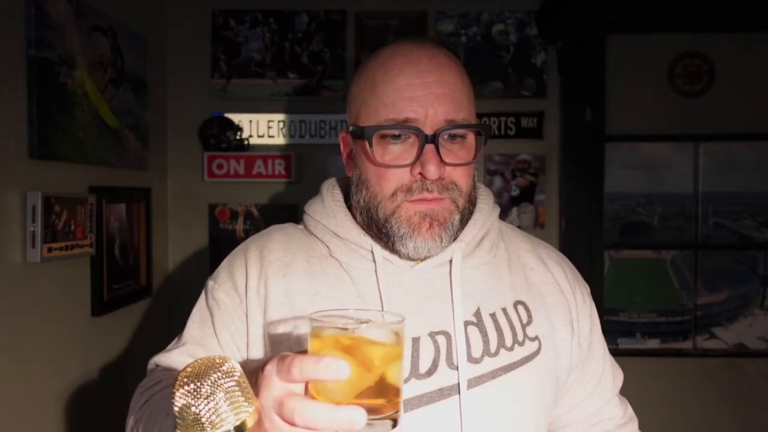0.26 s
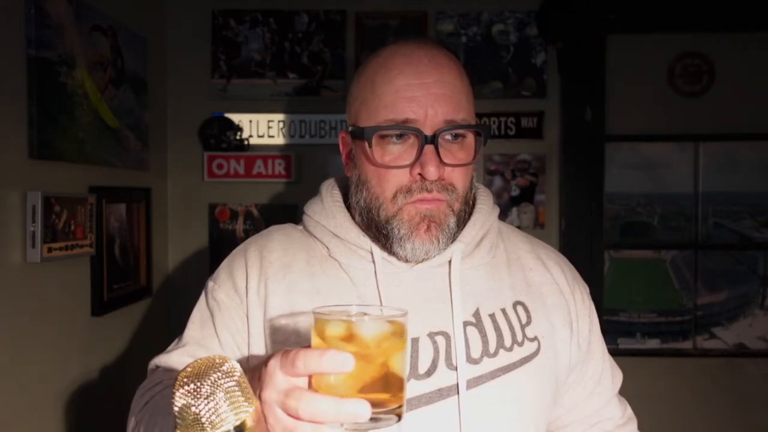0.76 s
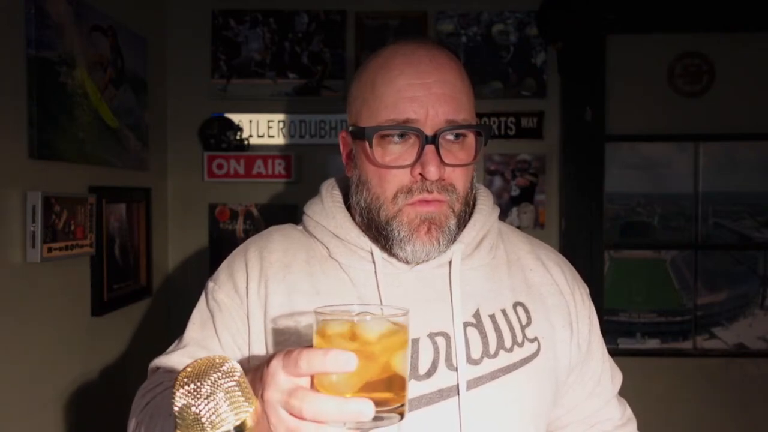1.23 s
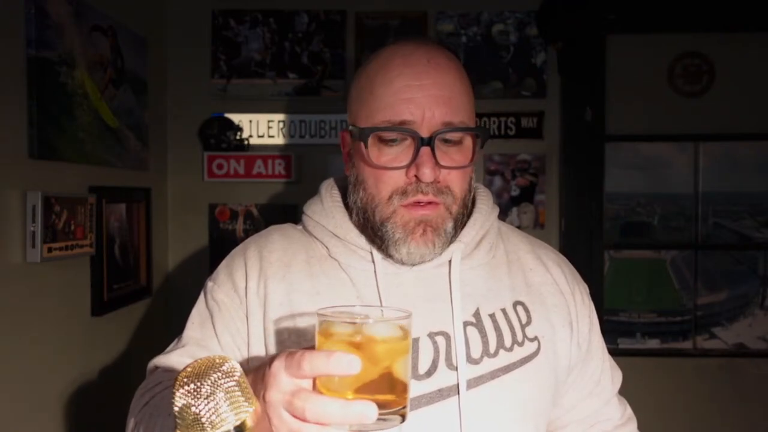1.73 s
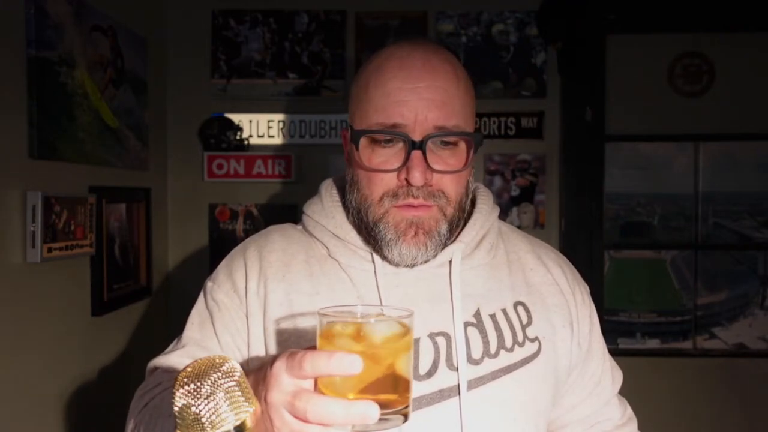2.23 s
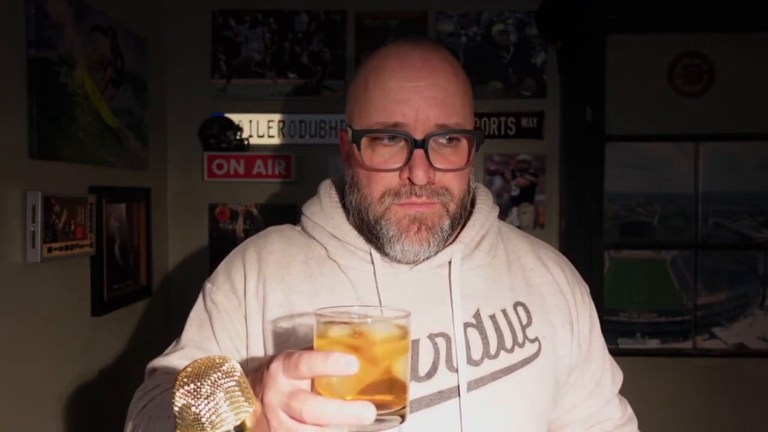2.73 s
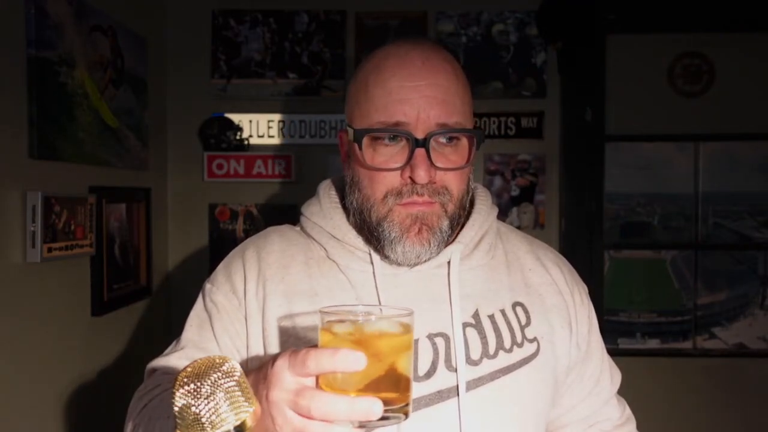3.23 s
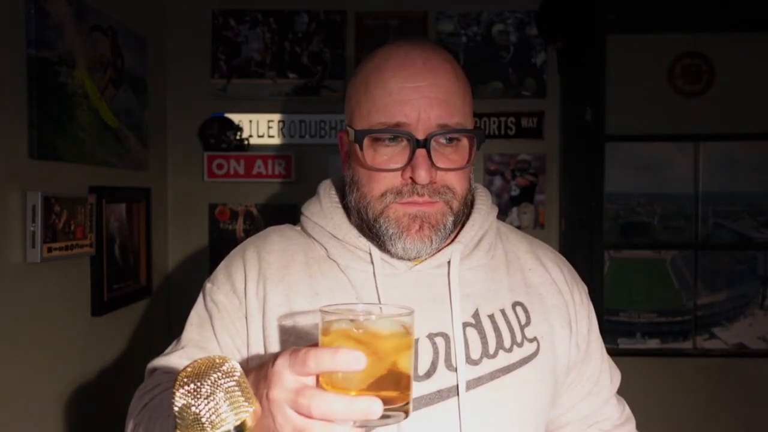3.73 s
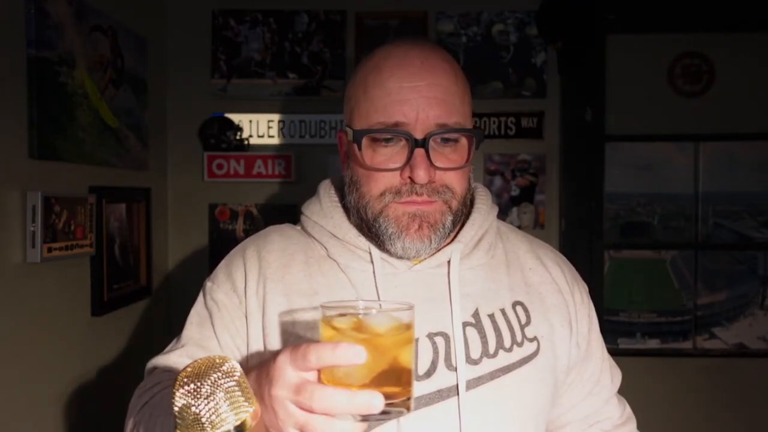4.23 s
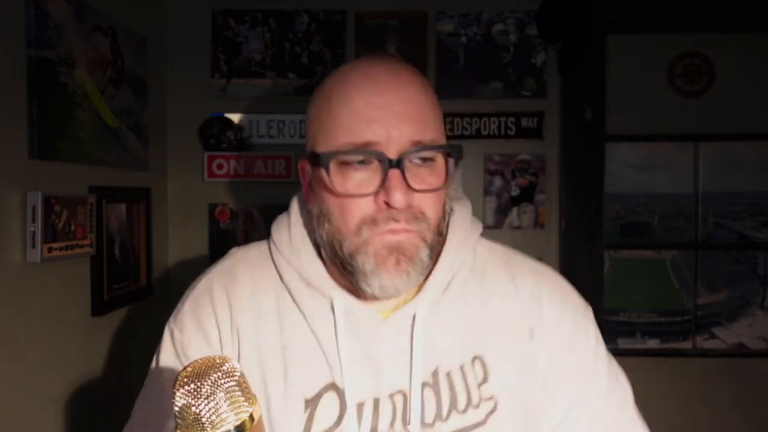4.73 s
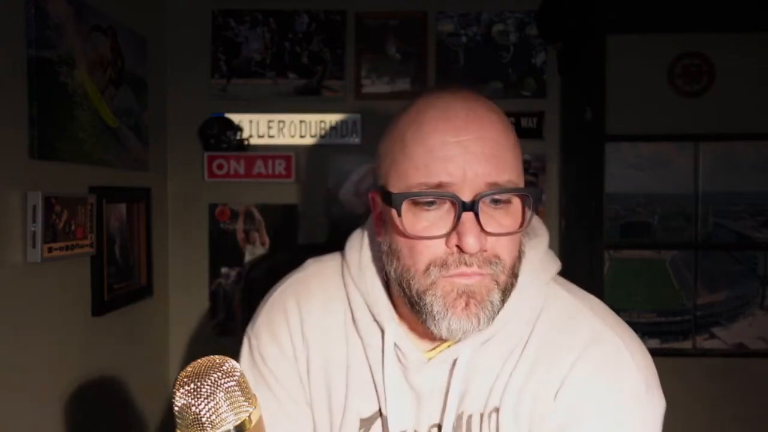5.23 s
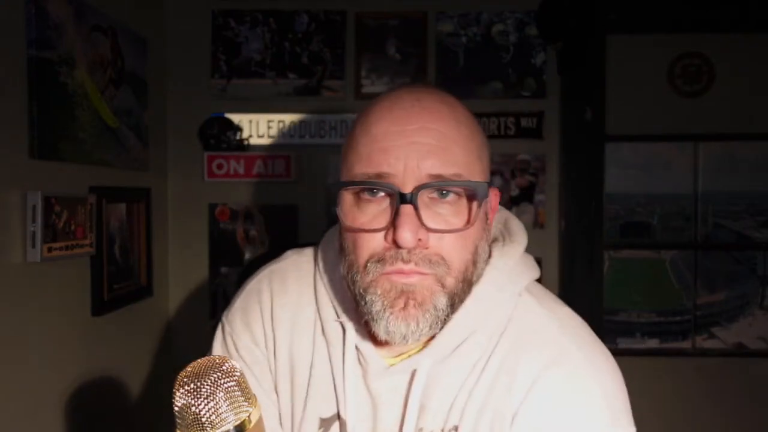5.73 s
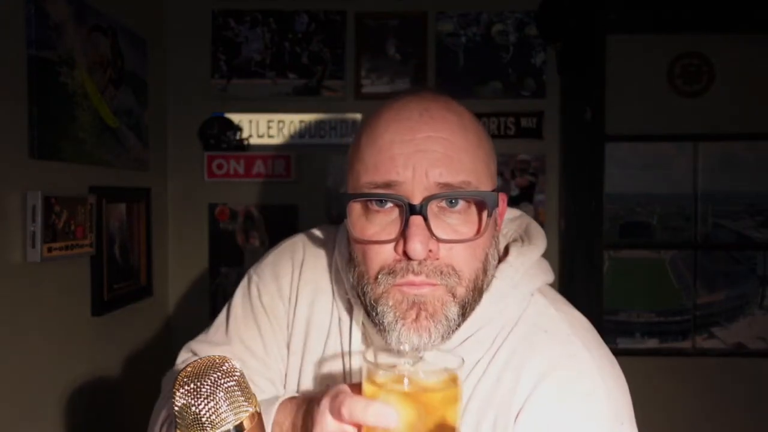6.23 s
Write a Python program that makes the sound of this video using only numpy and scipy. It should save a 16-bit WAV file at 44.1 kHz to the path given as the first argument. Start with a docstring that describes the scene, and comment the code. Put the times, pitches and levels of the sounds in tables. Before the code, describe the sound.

Close, busy rattling of ice against a tumbler for over four seconds, fading to faint clicks, a sleeve rustle and a dull low thump.

```python
"""Ice cubes swirled in a hand-held tumbler of drink strike its wall and tumble over one another.
Each contact sums damped sine modes of glass and cube with noise bursts for clack, tick and knock.
The drink gulps now and then: decaying sines that rise in pitch. Deep noise swells as the arm swings.
Then a sleeve rustles as uneven noise, and an elbow lands on the desk: low modes and two noise bursts.
The microphone is close, in a small, dead room of sparse, dull reflections and steady room tone."""
import sys
import numpy as np
from scipy import signal
from scipy.fft import rfft, irfft, next_fast_len
from scipy.io import wavfile

SR = 44100
rng = np.random.default_rng(int(sys.argv[2]) if len(sys.argv) > 2 else 0)


def wav_record(signal):
    """Record a signal, one row per channel, as 16-bit PCM in the file named by sys.argv[1]."""
    frames = np.transpose(np.atleast_2d(signal))
    bounded = np.clip(frames, -1, 1)
    # unit amplitude maps onto the largest positive 16-bit level
    quanta = np.round(bounded * 32767).astype(np.int16)
    wavfile.write(sys.argv[1], SR, quanta)


N = 284879

# All *_SPECTRUM tables hold relative gains; those of the contact bursts are shifted in pitch when used.

# room tone: hz, gain_db
AIR_SPECTRUM = [(30, -23.5), (70, -1.5), (140, 3.5), (380, -11.5), (650, -8.5), (1000, -22.5), (2000, -13),
                (5000, -30.5), (13000, -31), (16000, -30.5)]
AIR_DB = -72
# deep air noise of the moving arm: hz, gain_db
RUMBLE_SPECTRUM = [(10, -36), (24, -4), (32, 8.5), (41, -0.5), (50, -17.5), (90, -62.5)]
# swings of the arm push air at the microphone: peak_s, length_s, level_db
ARM_SWINGS = [(0.025, 0.22, -57.5), (0.373, 0.17, -49), (0.843, 0.14, -51.5), (1.25, 0.33, -60),
              (1.63, 0.39, -59), (4.64, 0.19, -58.5), (5.09, 0.3, -51), (5.586, .14, -45.5),
              (5.694, 0.11, -51.5), (5.863, 0.46, -54), (6.16, 0.18, -78)]
STILL_DB = -75  # rumble while the arm is nearly still

# sleeve friction before the unevenness and trims: time_s, rub_db, hiss_db
SLEEVE_LEVELS = [(4.75, -66.5, -73.5), (5.108, -72.5, -73.5), (5.232, -73, -73.5), (5.374, -74.5, -73.5),
                 (5.572, -77, -83), (5.758, -80.5, -75), (6.032, -75.5, -69.5), (6.146, -72.5, -67.5),
                 (6.312, -78, -72.5), (6.45, -90, -92)]
# cloth dragged over cloth: hz, gain_db
RUB_SPECTRUM = [(100, -2), (250, 4.5), (450, 2), (750, -3), (1300, -2.5), (2600, -29), (5200, -25),
                (8000, -60)]
# hiss of the cloth fibres: hz, gain_db
HISS_SPECTRUM = [(1500, -14), (3000, 6.5), (5200, 3), (6500, 0.5), (8000, 3.5), (11000, -4.5), (13500, 0.5),
                 (16000, -15)]

# the arm meets the desk: start_s, gain_db, rise_s, pitch_factor, ring_factor
DESK_BLOWS = [(5.744, -12, 0.02, 1.12, 0.43), (5.802, 6, 0.011, 1.1, 0.18), (5.834, -4, 0.0073, 0.96, 0.26),
              (5.867, 0, 0.0044, 1.02, 1)]
# desk modes, before each blow's gain and factors: nominal_hz, level_db, nominal_t60_s, build_up_s
DESK_MODES = [(187, -38, 0.53, 0.00088), (118.4, -33.5, 0.54, 0.089), (225.4, -62, 0.26, .002),
              (169.5, -64, 0.32, .002), (330, -54, 0.18, .002), (447, -60, 0.28, .002)]
# noise of the elbow's landing: hz, gain_db
BUMP_SPECTRUM = [(150, -26), (250, 1.5), (439, -18), (944, -13.5), (1230, -22.5), (1540, -18.5),
                 (1900, -27), (2110, -20), (5000, -55), (6500, -77), (11000, -120)]
# dull shudder of things on the desk: hz, gain_db
BOOM_SPECTRUM = [(60, -28), (120, 13.5), (210, -0.5), (300, -36), (500, -7), (1000, -53)]

# air pockets closing in the drink: start_s, level_db before the onset, start_hz, t60_s, relative_rise_per_s
GULPS = [(1.6495, -42.5, 586, 0.013, 13), (1.653, -64, 840, 0.12, 1.6), (2.16, -53, 327, 0.1, 0.32),
         (2.177, -51.5, 285, 0.12, 0.27), (2.218, -57, 299, 0.15, .2), (2.276, -58, 274, 0.12, 0.26),
         (4.405, -60.5, 192, 0.24, 0.42)]

# clear contacts: start_s, low_mode_db before radiation, low_mode_hz, # low_mode_t60_s before settling,
# upper_mode_db (nominal), ice_hardness_db (nominal)
CLINKS = [ (0.0361, -50, 1800, 0.2, -41.5, -52), (.1121, -36, 1700, 0.028, -36, -43.5),
          (0.1166, -19, 1693, .081, -33, -34), (.1553, -67, 1800, .08, -44, -45.5),
          (0.203, -41.5, 1790, 0.033, -50, -58), (0.2226, -49, 1810, .12, -40.5, -58),
          (0.2415, -40, 1736, 0.062, -53, -59), (0.3227, -31, 1685, 0.24, -62, -48.5),
          (0.332, -59, 1702, 0.1, -35, -43), (0.3517, -25.5, 1736, 0.026, -44, -45.5),
          (0.3996, -53, 1780, 0.083, -49, -44), (0.5219, -31, 1670, .069, -39.5, -56),
          (0.5968, -45, 1720, .1, -44, -50.5), (0.6476, -51, 1623, .11, -50, -66),
          (0.658, -39.5, 1733, 0.079, -44, -56), (0.674, -47, 1730, 0.12, -38.5, -47.5),
          (0.7545, -34, 1600, 0.077, -33.5, -59), (0.7571, -20, 1688, 0.083, -34.5, -35),
          (0.8092, -41, 1740, 0.084, -45, -53), (.845, -39, 1820, 0.071, -36.5, -48),
          (0.972, -42, 1800, 0.024, -69, -74), (.9912, -49.5, 1710, 0.17, -42, -60),
          (1.0135, -48.5, 1770, 0.087, -49, -63), (1.0745, -59, 1775, 0.099, -42, -51.5),
          (1.1426, -46.5, 1790, 0.02, -45, -59), (1.168, -50, 1686, 0.073, -53, -79),
          (1.2439, -57, 1860, 0.16, -41, -52), (1.2785, -47.5, 1690, 0.045, -47, -59),
          (1.3076, -44.5, 1750, 0.068, -42, -56.5), (1.4485, -42.5, 1690, 0.033, -44.5, -46.5),
          (1.4939, -33, 1634, 0.012, -43.5, -50.5), (1.579, -28.5, 1670, 0.0076, -39.5, -53.5),
          (1.645, -46, 1710, 0.07, -66, -68), (1.6701, -47.5, 1710, 0.24, -50, -51),
          (1.695, -62, 1780, .095, -48, -55), (1.7741, -36.5, 1660, 0.016, -59, -64),
          (1.7917, -45, 1655, 0.072, -46.5, -57.5), (1.8798, -42.5, 1800, 0.034, -50, -63.5),
          (1.9704, -42.5, 1650, 0.037, -48.5, -51), (2.0309, -59, 1663, .18, -58, -54.5),
          (2.0742, -48.5, 1720, 0.15, -45.5, -72), (2.1107, -44.5, 1716, 0.077, -51, -92),
          (2.122, -60, 1690, .05, -58, -56), (2.1583, -40.5, 1648, 0.063, -44, -56),
          (2.1743, -32.5, 1655, 0.042, -39, -50.5), (2.21, -41.5, 1690, 0.058, -46, -70),
          (2.2582, -49, 1730, 0.067, -51, -46), (2.3, -48.5, 1720, 0.087, -42, -55),
          (2.3347, -39, 1720, 0.082, -51.5, -57), (2.4043, -41, 1710, 0.087, -46, -56.5),
          (2.4252, -24, 1694, 0.079, -37, -43), (2.4718, -43, 1790, 0.11, -59, -43.5),
          (2.5948, -39, 1710, .036, -45.5, -66), (2.6304, -40, 1780, 0.02, -44, -45),
          (2.6439, -31.5, 1670, 0.021, -39, -50.5), (2.6683, -45.5, 1677, 0.069, -49, -45.5),
          (2.7095, -46.5, 1747, 0.087, -39, -47), (2.784, -43, 1730, .07, -40.5, -56.5),
          (2.8225, -29, 1683, 0.05, -38, -49.5), (2.8453, -47, 1695, 0.15, -56, -40.5),
          (2.8527, -55, 1770, 0.11, -37.5, -68), (2.8633, -66, 1704, .09, -33.5, -48),
          (2.8878, -44.5, 1705, 0.097, -60, -66), (2.95, -43.5, 1670, 0.072, -49, -60),
          (2.9926, -46, 1600, .08, -43, -47), (3.0068, -34, 1678, .12, -39.5, -55),
          (3.0453, -42, 1737, 0.06, -42, -42.5), (3.06, -42, 1715, 0.065, -46, -60),
          (3.116, -36.5, 1723, 0.14, -55, -54.5), (3.1454, -25.5, 1697, 0.11, -36, -40),
          (3.2174, -57, 1820, 0.1, -66, -42.5), (3.2368, -49.5, 1746, 0.22, -74, -48.5),
          (3.3075, -42, 1695, 0.13, -70, -68), (3.3295, -40.5, 1757, 0.17, -43, -52),
          (3.3433, -27.5, 1685, .08, -38, -43.5), (3.4074, -49, 1746, .087, -61, -46.5),
          (3.4138, -42.5, 1714, 0.083, -48, -50.5), (3.5294, -46.5, 1690, 0.23, -54, -64),
          (3.5666, -33.5, 1690, 0.11, -38, -48.5), (3.587, -60, 1760, .11, -60, -48.5),
          (3.644, -45.5, 1704, 0.22, -51, -65), (3.7063, -51, 1780, .095, -52, -54.5),
          (3.7143, -32.5, 1720, 0.052, -35, -57), (3.8062, -80, 1800, .14, -42, -46),
          (3.819, -64, 1630, 0.11, -44, -49), (3.8479, -48, 1784, 0.14, -38, -54),
          (3.943, -24.5, 1698, 0.04, -29.5, -42), (3.982, -43.5, 1724, .08, -62, -76),
          (3.9982, -47, 1673, .12, -73, -52), (4.0136, -52, 1687, 0.17, -44, -47),
          (4.045, -42.5, 1776, 0.091, -38.5, -50), (4.148, -41.5, 1734, 0.13, -38.5, -51),
          (4.176, -46, 1680, 0.29, -40, -70.5), (4.1939, -24.5, 1740, 0.036, -31.5, -42.5),
          (4.238, -54, 1820, 0.13, -49, -50.5), (4.2684, -53, 1780, .06, -41, -51.5),
          (4.285, -39.5, 1752, 0.14, -34, -53.5), (4.371, -49.5, 1710, 0.1, -48.5, -82),
          (4.4001, -34, 1640, 0.011, -43, -56), (4.48, -56, 1775, 0.16, -45, -56),
          (4.535, -50, 1787, 0.075, -42.5, -46), (4.6828, -49, 1660, 0.047, -52, -52),
          (4.7026, -54, 1760, 0.14, -45, -52.5), (4.7193, -43, 1723, 0.059, -46, -74),
          (4.762, -43, 1727, 0.017, -45.5, -57.5), (4.7894, -53, 1740, 0.086, -53, -61.5),
          (4.905, -64, 1695, .15, -63, -65), (5.185, -64, 1730, 0.076, -58.5, -74),
          (5.3382, -55, 1720, 0.022, -56, -73), (5.5113, -64, 1670, 0.025, -56.5, -68.5),
          (5.5608, -64, 1654, 0.05, -61, -62.5), (5.6299, -56, 1660, 0.032, -54, -65.5),
          (5.7663, -65, 1730, .08, -58.5, -64.5), (5.914, -70, 1760, 0.09, -57, -59),
          (5.938, -67, 1790, 0.11, -57, -69), (5.971, -60, 1860, 0.066, -51, -66),
          (6.0974, -59, 1750, 0.06, -66, -72)]
# cubes tumbling with each swing of the hand: start_s, length_s, nominal_level_db, brightness_db
RATTLES = [(0.017, .02, -59.5, 4.5), (0.172, .02, -59.5, 0), (0.226, .025, -56, -2),
           (0.367, .025, -64.5, -13), (0.415, .045, -55, -1), (.61, .045, -59.5, 2.5),
           (0.726, .025, -52.5, 2.5), (0.785, .06, -55.5, 5), (0.851, .04, -58, 0), (0.907, .02, -56.5, -3),
           (1.093, .02, -52.5, -1), (1.186, .02, -61.5, 12), (1.385, .045, -57, -14),
           (1.458, .11, -65.5, 6), (1.588, .04, -61.5, -1), (1.682, .02, -58, 7), (1.802, .035, -65, 1),
           (2.078, .05, -65.5, 8), (2.19, .02, -56, -4.5), (2.27, .025, -59, 4), (2.479, .08, -57.5, 5.5),
           (2.85, .03, -60, 12), (3.038, .02, -60.5, 10), (3.232, .025, -58, 10.5),
           (3.574, .04, -60.5, 2.5), (3.727, .065, -57.5, -3), (3.814, .04, -53, 3), (3.956, .02, -55, -9),
           (4.042, .045, -53, -1), (4.15, .02, -58, 5), (4.22, .025, -59, 8.5), (4.49, .03, -61.5, 7.5),
           (4.653, .11, -65.5, 4)]
# light touches between the contacts: time_s, touches_per_s, nominal_level_db
JOSTLE = [(0, 63, -66), (1.001, 72.3, -68), (1.5, 66, -68.5), (1.902, 44.3, -68.5), (2.5, 72.6, -62.5),
          (4.601, 65, -73), (4.9, 40, -69), (5.4, 32.7, -74.5), (6.0, 31.5, -72), (6.4, 28, -80.5)]
# clack of a cube on the wall: hz, gain_db
CLACK_SPECTRUM = [(1000, -59.5), (2000, 8), (2500, 7), (2950, 7), (3400, -20.5), (3750, 13), (4600, -50.5),
                  (7000, -72)]
# brief ring of the cubes themselves: hz, gain_db
CUBE_SPECTRUM = [(1500, -53), (3300, -4.5), (3750, -4.5), (4250, 4), (4600, -4), (4950, -4.5), (5700, -17),
                 (6600, -12), (7600, -28.5), (9500, -34.5)]
# sharp tick of a contact: hz, gain_db
TICK_SPECTRUM = [(3000, -27.5), (5400, -8.5), (6500, 4.5), (7500, 2), (8700, 1), (9550, 4), (10600, -5.5),
                 (13000, -11.5), (15500, -29.5)]
# dull knock through the drink: hz, gain_db
KNOCK_SPECTRUM = [(100, -32), (300, -10), (600, -32.5), (900, -61), (1300, -7), (2000, 25.5), (3000, 9),
                  (4200, -29.5)]
# how well the hand-held glass radiates: hz, gain_db
RADIATION = [(80, -31.5), (260, -12), (600, -6.5), (950, -7), (1450, -2.5), (1750, -0.5)]

T = np.arange(int(SR * .1)) / SR  # time axis of one contact or gulp, s
UPPER_HZ, UPPER_T60 = 2614, 0.029  # central pitch (Hz), decay (s); drink and fingers damp the glass
TWIN_HZ, TWIN_T60 = 1695, 0.17  # weak partner of the low mode, node near the fingers (central Hz, s)
SETTLE_S, SETTLE_T60 = 0.028, 0.15  # cube falls back and chokes the ring (s after contact, added decay s)
# second central pitch of a cube as a ratio, and its level against the first in dB
OVERTONE, OVERTONE_DB = 1.5, -10
# each cube has its own pitch: dB against its ring, central Hz, log spread, decay s
PING_DB, PING_HZ, PING_SPREAD, PING_T60 = -10, 4510, .1, 0.027
# clack follows the upper mode by this share and the hardness by the rest; tick follows hardness
CLACK_DB, CLACK_SHARE, TICK_DB = -6.5, 0.26, -11.5
# knock follows the low mode by this share and the clack by the rest
KNOCK_DB, KNOCK_SHARE = -8, 0.67
# sharp corners tick brighter than wet, rounded ones: spread in dB per octave above the pivot, Hz
TICK_TILT_DB, TICK_PIVOT_HZ = 10, 6100
CHATTER_PER_S = 700  # mean rate of tiny rebounds
RATTLE_GAP_S, RATTLE_SCATTER = 0.011, 0.77  # mean touch spacing (s), largest stray as a share of it
# harder strikes first graze neighbours: low-mode threshold dB, s ahead, nominal dB against hardness
GRAZE_ABOVE_DB, GRAZE_S, GRAZE_DB = -31, .004, -22.5
EDGE_HZ = 16100


def amp(db):
    """Logarithmic level: decibels to linear gain."""
    return 10 ** (np.asarray(db) / 20)


def add(mix, s, sound):
    """Superposition: sums a sound into the mix at time s."""
    part = mix[max(round(s * SR), 0):][:len(sound)]
    part += sound[:len(part)]


def read(points, hz):
    """Spectral envelope: gain in dB interpolated over log frequency."""
    point_hz, db = np.transpose(points)
    return np.interp(np.log(hz + 1), np.log(point_hz + 1), db)


def colour(x, shape_db):
    """Minimum-phase filtering: folding the cepstrum makes a given gain curve causal."""
    size = next_fast_len(len(x), True) * 2
    gain_db = np.maximum(shape_db(np.fft.rfftfreq(size, 1 / SR)), -100)
    cepstrum = irfft(np.log(amp(gain_db)))
    cepstrum[1:size // 2] *= 2
    cepstrum[size // 2 + 1:] = 0
    response = np.exp(rfft(cepstrum))
    return irfft(rfft(x, size) * response)[:len(x)]


def noise(points):
    """Stationary random noise: white noise shaped by a spectrum and scaled to rms 1."""
    white = rfft(rng.standard_normal(N))
    x = irfft(white * amp(read(points, np.fft.rfftfreq(N, 1 / SR))), N)
    return x / x.std()


def level(rows):
    """Amplitude envelope: a dB curve as a gain for every sample."""
    return amp(np.interp(np.arange(N) / SR, *np.transpose(rows)))


def room(x, wet_db, t60):
    """Reverberation: sparse, dull reflections of a small furnished room decay exponentially."""
    t = np.arange(SR // 2) / SR
    signs = rng.choice([-1., 1.], len(t))
    present = rng.random(len(t)) < 2000 / SR  # mean of 2000 reflections a second
    taps = signs * present * (t > .005) * amp(-60 * t / t60)
    tail = signal.lfilter(*signal.butter(1, 7000, fs=SR), taps / np.linalg.norm(taps))
    return amp(wet_db) * signal.oaconvolve(x, tail)[:N]


def room_tone():
    """Ambient noise: a stationary random sound of fixed spectrum."""
    return amp(AIR_DB) * noise(AIR_SPECTRUM)


def arm():
    """Air displacement: each swing swells and fades as a deep rumble under a raised cosine."""
    t = np.arange(N) / SR
    push = np.zeros(N)
    for peak_s, length, db in ARM_SWINGS:
        phase = np.clip((t - peak_s) / length, -.5, .5)
        push += amp(db) * np.cos(np.pi * phase) ** 2
    return (amp(STILL_DB) + push) * noise(RUMBLE_SPECTRUM)


def sleeve():
    """Stick-slip friction: cloth rubs unevenly as the arm goes down and comes forward."""
    rows, t = np.array(SLEEVE_LEVELS), np.arange(N) / SR
    moving = np.clip((t - rows[0, 0]) / 0.21, 0, 1)
    # folds catch and slip: slow level changes of 2 dB rms
    catch = amp(2 * noise([(1, -1), (40, -10.5), (150, -66), (600, -75)]))
    hiss = noise(HISS_SPECTRUM)
    dull_hiss = amp(-2.0) * signal.lfilter(*signal.butter(1, 7500, fs=SR), hiss)
    resting = np.clip((t - 5.5) / 0.39, 0, 1)  # with the elbow on the desk the cloth sounds duller
    hiss = (1 - resting) * hiss + resting * dull_hiss
    rub = amp(1.0) * level(rows[:, [0, 1]]) * noise(RUB_SPECTRUM)
    fibres = amp(-3.0) * level(rows[:, [0, 2]]) * hiss
    return moving * catch * (rub + fibres)


def desk():
    """Plate resonance: the forearm touches, then the elbow lands and the desk top booms."""
    out, t = np.zeros(N), np.arange(SR) / SR
    for s, blow_db, rise, pitch, ring in DESK_BLOWS:
        for hz, db, t60, build in DESK_MODES:
            swell = (1 - np.exp(-(t / rise) ** 2)) * (1 - np.exp(-t / build))
            decay = amp(blow_db + db - 60 * t / (t60 * ring))
            add(out, s, decay * swell * np.sin(2 * np.pi * hz * pitch * t))
    bump = noise(BUMP_SPECTRUM)[:SR] * amp(-47.5 - 60 * t / 0.17) * (1 - np.exp(-t / 0.0012))
    boom = noise(BOOM_SPECTRUM)[:SR] * amp(-61.0 - 60 * t / 3.4) * (1 - np.exp(-t / 0.014))
    add(out, 5.857, bump)
    add(out, 5.86, boom)
    return out


def drink():
    """Bubble resonance: each pocket of air rings and rises in pitch as it closes."""
    out = np.zeros(N)
    for s, db, hz, t60, rise in GULPS:
        envelope = amp(db - 60 * T / t60) * (1 - np.exp(-T / 0.00063))
        cycles = hz * (T + rise * T ** 2 / 2)
        add(out, s, envelope * np.sin(2 * np.pi * cycles))
    return out


def mode(db, hz, t60):
    """Damped oscillation: a struck sine decays exponentially."""
    return amp(db - 60 * T / t60) * np.sin(2 * np.pi * hz * T)


def crack(points, shift, t60, grit, chatter_db, chatter_t60):
    """Impact excitation: an impulse, gritty crush and faint rebounds; rms 1 over the first 4 ms."""
    t = T[:1536]
    rebounds = (rng.random(len(t)) < CHATTER_PER_S / SR) * np.sqrt(SR / CHATTER_PER_S)
    crush = amp(-60 * t / t60)
    chatter = rebounds * amp(chatter_db - 60 * t / chatter_t60)
    x = grit * rng.standard_normal(len(t)) * (crush + chatter)
    x[0] += 1
    x = colour(x, lambda hz: read(points, hz / shift))
    return x / np.sqrt(np.mean(x[:176] ** 2))


def glass(low_db, low_hz, low_t60, upper_db, spot, edge, lean):
    """Modal vibration: damped modes of the wall are weighted by how well the glass radiates."""
    settling = amp(-60 * np.maximum(T - SETTLE_S, 0) / SETTLE_T60)
    wall = mode(low_db, low_hz, low_t60) * settling
    wall += mode(low_db - 25, TWIN_HZ * (1 + 0.0075 * lean), TWIN_T60)
    wall += mode(upper_db + 1.1, UPPER_HZ * (1 + 0.026 * spot), UPPER_T60)
    # this mode shifts with the cubes that touch the wall
    wall += mode(upper_db - 18.5 + 3 * lean, 2200 * (1 + 0.037 * edge), t60=0.091)
    return colour(wall, lambda hz: read(RADIATION, hz))


def cube_ping(cube_db, size, shape):
    """Free vibration: a cube rings at its own pitch and an inexact overtone."""
    hz = PING_HZ * np.exp(PING_SPREAD * size)
    first = mode(cube_db + PING_DB, hz, PING_T60)
    overtone_hz = hz * OVERTONE * (1 + .06 * shape)
    return first + mode(cube_db + PING_DB + OVERTONE_DB, overtone_hz, t60=0.017)


def clink(low_db, low_hz, low_t60, upper_db, clack_db, cube_db, tick_db):
    """Collision: one contact of a cube with wall or cube excites glass, ice and drink together."""
    spot, size, edge, lean, corner, shape = np.clip(rng.standard_normal(6), -2, 2)
    out = glass(low_db, low_hz, low_t60, upper_db, spot, edge, lean)
    out += cube_ping(cube_db, size, shape)
    clack = crack(CLACK_SPECTRUM, 1 + 0.092 * spot, t60=0.0079, grit=1.0,
                  chatter_db=-21.5, chatter_t60=0.085)
    add(out, 0, amp(clack_db) * clack)
    cube = crack(CUBE_SPECTRUM, 1 + 0.043 * size, t60=0.0034, grit=0.21,
                 chatter_db=-22.0, chatter_t60=0.048)
    add(out, 0, amp(cube_db - 1.5) * cube)
    tilted = []
    for hz, db in TICK_SPECTRUM:
        octaves = max(np.log2(hz / TICK_PIVOT_HZ), 0)
        tilted.append((hz, db + TICK_TILT_DB * corner * octaves))
    tick = crack(tilted, 1 + 0.011 * edge, t60=0.0088, grit=0.19, chatter_db=-15.5, chatter_t60=0.078)
    add(out, 0, amp(tick_db) * tick)
    knock_db = KNOCK_SHARE * low_db + (1 - KNOCK_SHARE) * clack_db + KNOCK_DB
    knock = crack(KNOCK_SPECTRUM, 0.854, t60=0.02, grit=0.076, chatter_db=-10.5, chatter_t60=0.055)
    add(out, 0, amp(knock_db) * knock)
    return out


def touch(db, bright_db, scatter_db):
    """Weak coupling: a random light contact of a cube, softer than the clear contacts, that rings the glass
    along with its clack and tick."""
    force, low, upper, size, hard, sharp = np.clip(rng.standard_normal(6), -1.5, 1.5)
    db = db + scatter_db * force
    ice_db = db + bright_db + 6.5 * hard
    return clink(low_db=db + 3.5 + 5.5 * low, low_hz=1745 + 25 * size, low_t60=0.083,
                 upper_db=db + 6.0 + 2.1 * upper, clack_db=db - 4.5,
                 cube_db=ice_db - 6.0, tick_db=ice_db - 16.5 + 1.2 * sharp)


def jostle():
    """Random point process: light touches follow a varying mean rate, one to each unit of its sum."""
    out, t = np.zeros(N), np.arange(N) / SR
    s, rate, db = np.transpose(JOSTLE)
    due = np.cumsum(np.interp(t, s, rate)) / SR  # touches due by each moment
    for k in range(int(due[-1])):
        at = np.interp(k + rng.random(), due, t)
        add(out, at, touch(np.interp(at, s, db), bright_db=-1.5, scatter_db=2.5))
    return out


def rattle():
    """Repeated impact: tumbling cubes touch in short trains of jittered spacing."""
    out = np.zeros(N)
    for start, length, db, bright_db in RATTLES:
        for k, stray in enumerate(rng.random(size=12)):
            after = (k + RATTLE_SCATTER * stray) * RATTLE_GAP_S
            if after < length:
                add(out, start + after, touch(db, bright_db, scatter_db=3.5))
    return out


def wall_strikes():
    """Impact on a shell: clear contacts ring the glass, the harder ones after a graze of neighbours."""
    out = np.zeros(N)
    for s, low_db, low_hz, low_t60, upper_db, hard_db in CLINKS:
        clack_db = CLACK_SHARE * upper_db + (1 - CLACK_SHARE) * hard_db + CLACK_DB
        add(out, s, clink(low_db, low_hz, low_t60, upper_db, clack_db, hard_db, hard_db + TICK_DB))
        if low_db > GRAZE_ABOVE_DB:
            add(out, s - GRAZE_S, touch(hard_db + GRAZE_DB, bright_db=-5, scatter_db=-2.0))
    return out


def ice():
    """Superposed impacts: light touches, rattles and clear contacts make up the swirling ice."""
    return jostle() + rattle() + wall_strikes()


def scene():
    """Direct and reflected sound: glass and desk in the room, over sleeve, arm rumble and room tone."""
    background = room_tone() + arm() + sleeve()
    near = desk() + drink() + ice()
    return (near + room(near, wet_db=-18.5, t60=0.2) + background)[None]


def record(dry):
    """Band limiting: a linear-phase low-pass sets the recorder's upper edge."""
    low_pass = signal.firwin(511, EDGE_HZ, window=("kaiser", 9), fs=SR)
    return signal.oaconvolve(dry, low_pass[None], "same")


dry = scene()
out = record(dry)
wav_record(out)
```